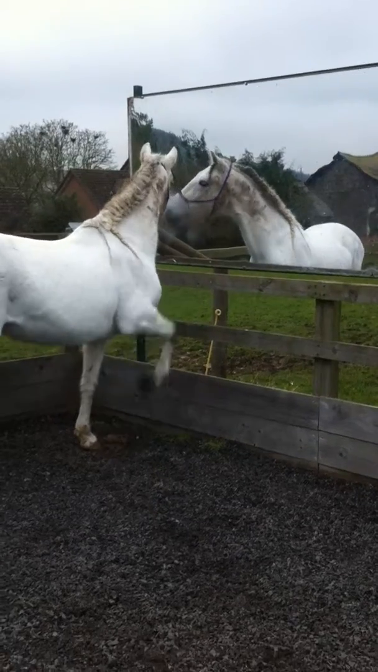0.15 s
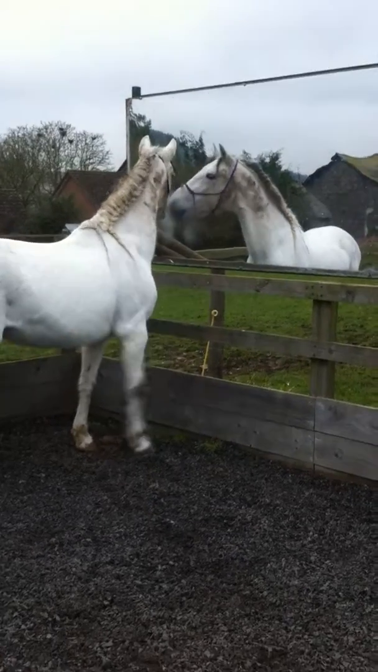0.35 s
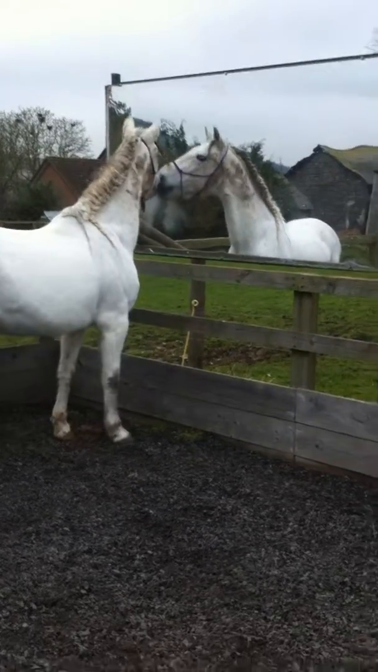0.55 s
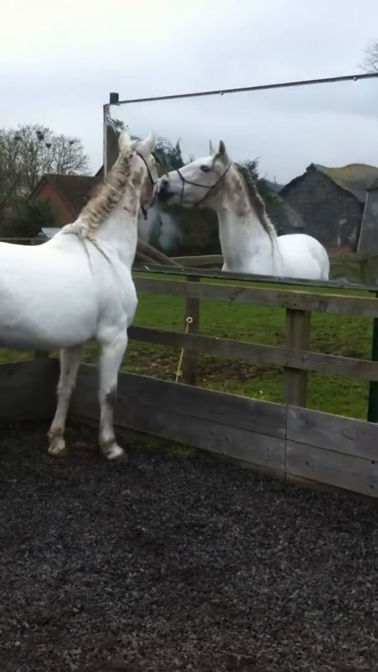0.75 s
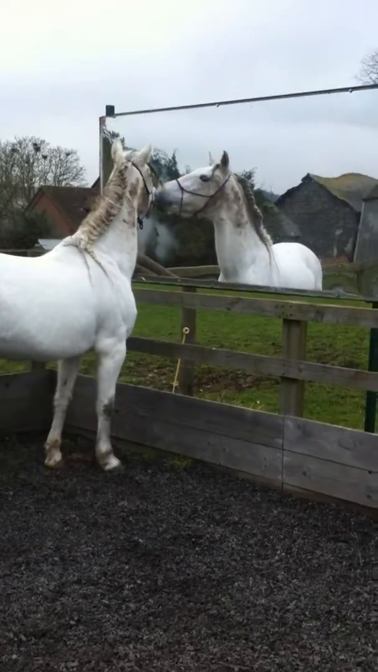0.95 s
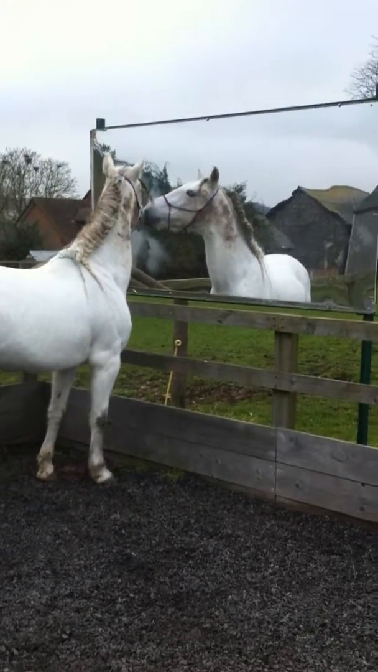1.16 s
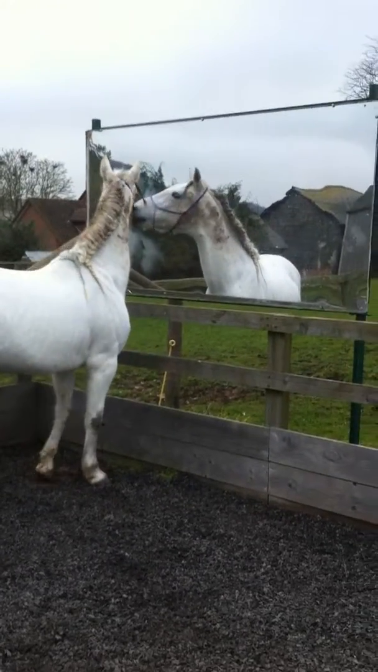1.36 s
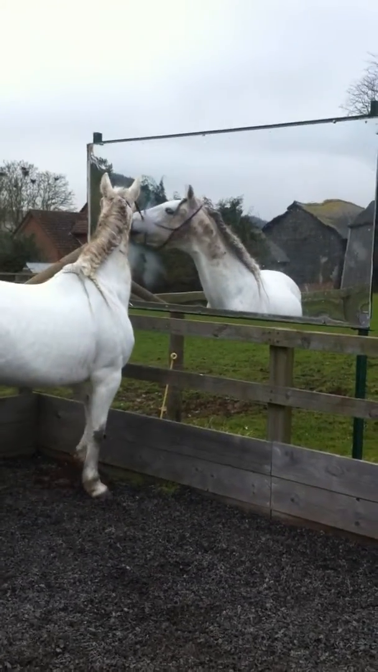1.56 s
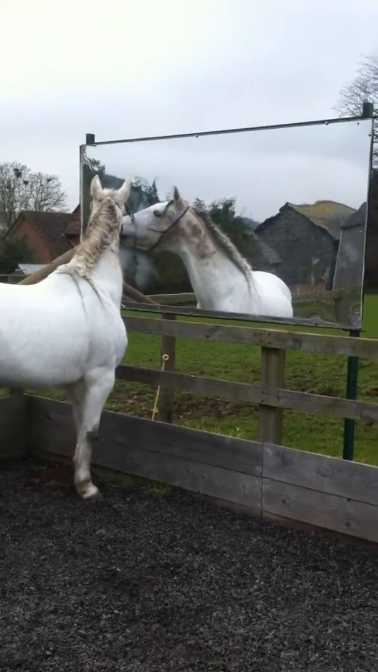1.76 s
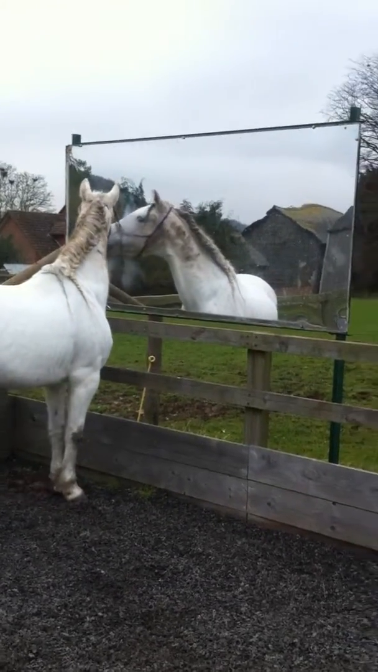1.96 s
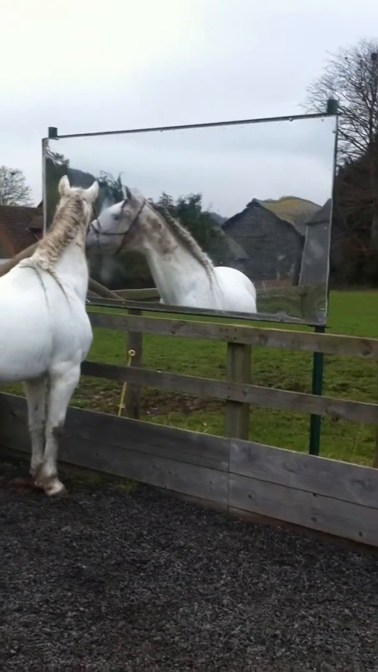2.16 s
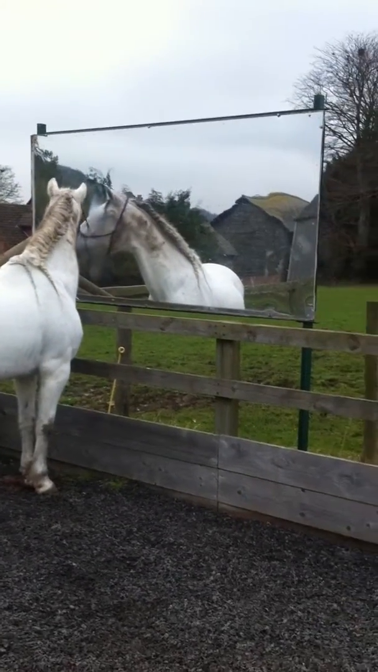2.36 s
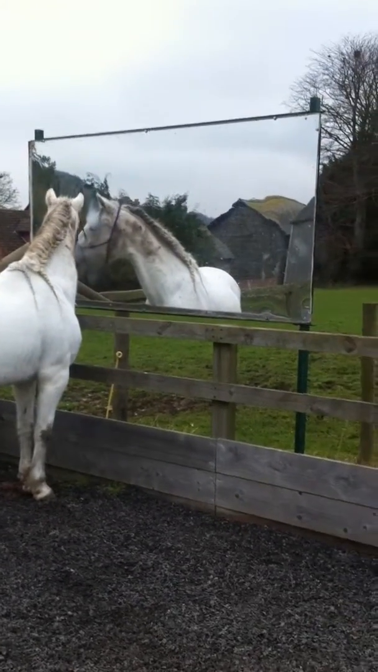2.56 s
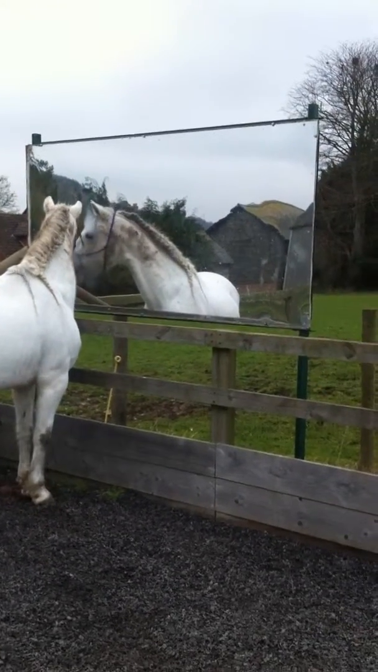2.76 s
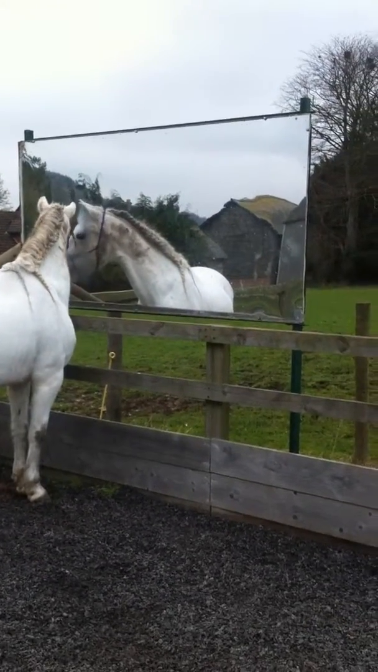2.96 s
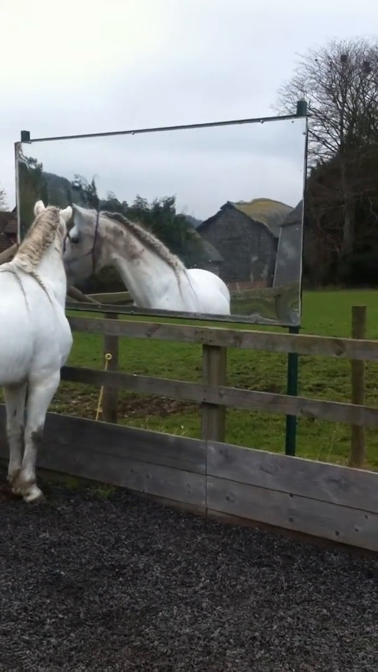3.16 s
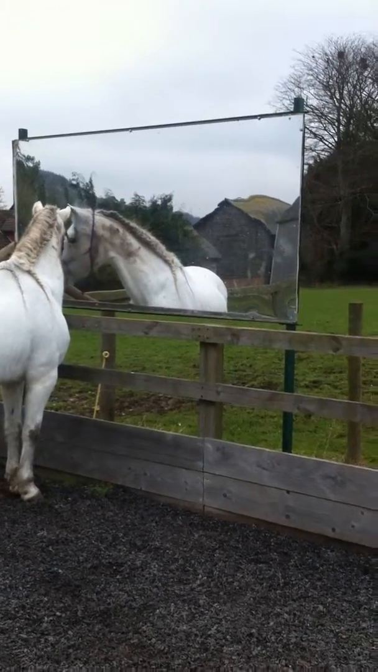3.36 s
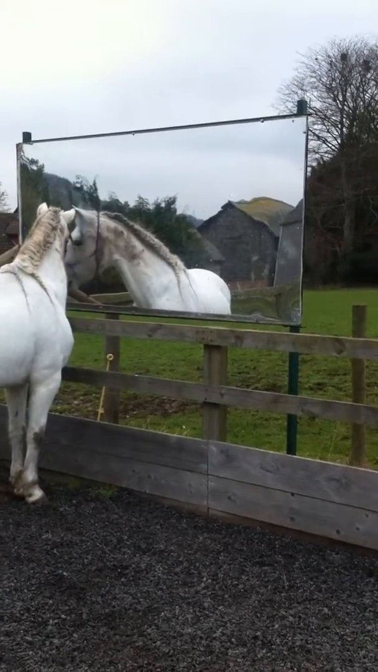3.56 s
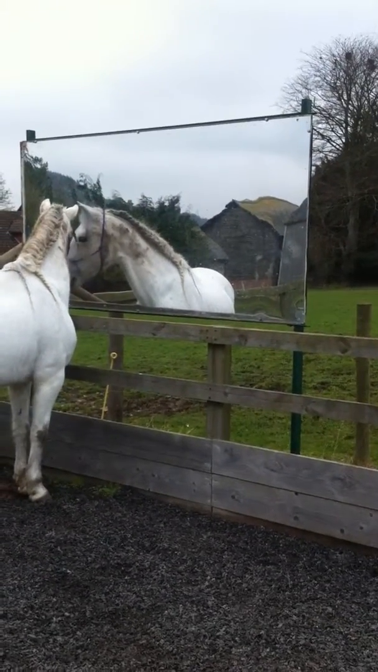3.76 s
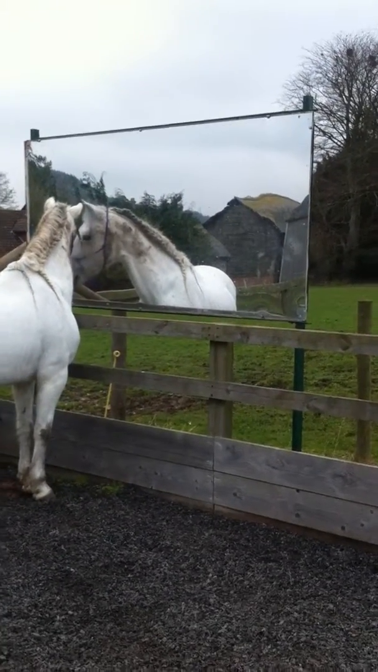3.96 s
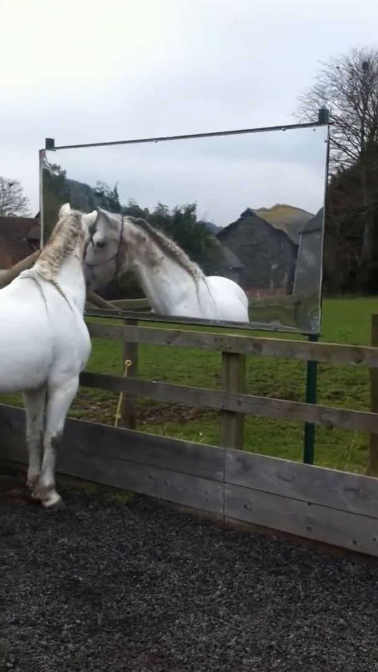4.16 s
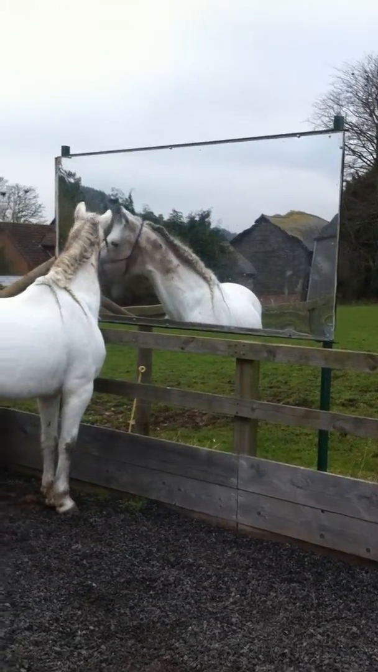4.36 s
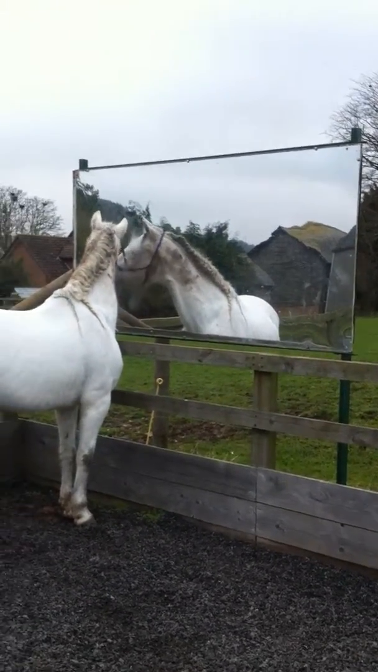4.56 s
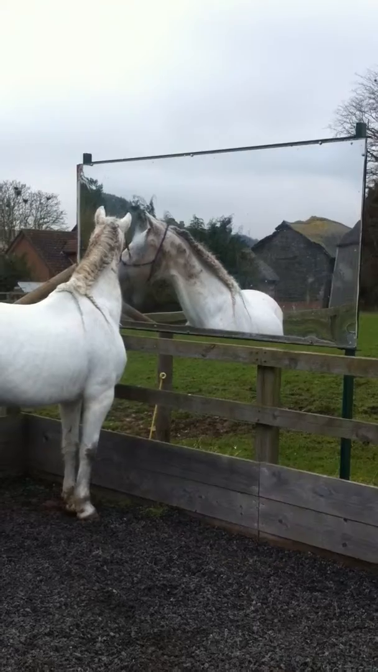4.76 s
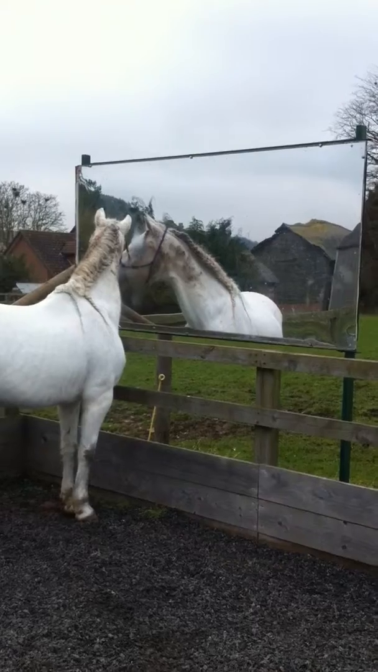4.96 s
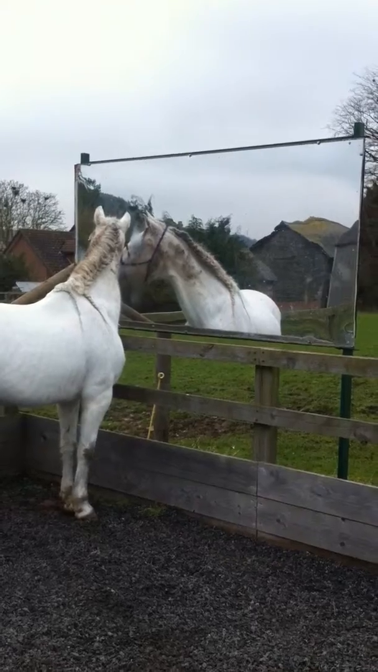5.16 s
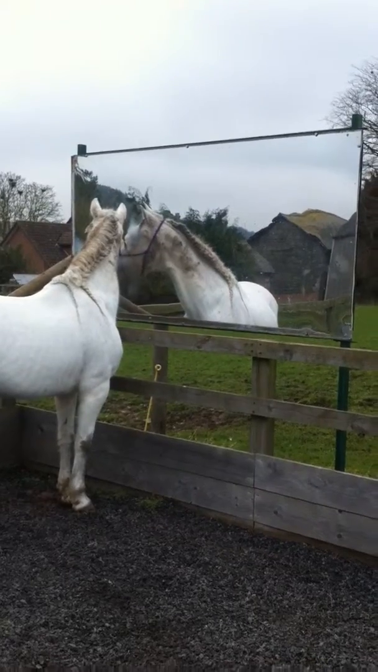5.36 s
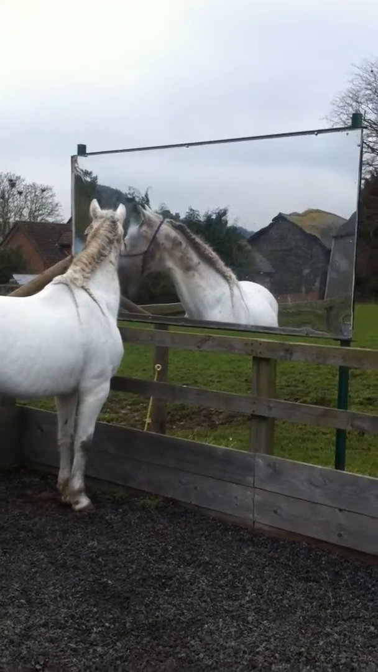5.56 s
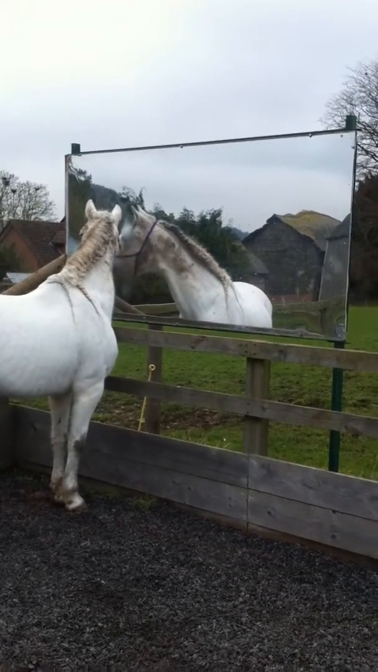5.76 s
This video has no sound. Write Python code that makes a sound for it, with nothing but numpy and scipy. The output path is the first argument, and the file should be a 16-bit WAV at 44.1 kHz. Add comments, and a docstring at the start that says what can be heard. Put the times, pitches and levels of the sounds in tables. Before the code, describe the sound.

A horse gives one high, strained squeal and stamps a hoof, then faint birds call over a hush of distant traffic.

```python
"""Distant traffic hushes over open country, and a small bird wheezes faintly. In a sand school a horse
squeals at its image in a mirror: the vocal folds shoot up to a strained tone, a second whistle beating
against it. A forefoot stamps as the closing mouth turns the call hoarse and nasal; it drops to a grunt,
and far buildings echo it. Grit ticks under the hooves, the songbird whistles, another bird chips in short
series, a hollow rush passes far off, and the songbird returns."""
import sys
import numpy as np
from scipy import signal
from scipy.fft import rfft, irfft, next_fast_len
from scipy.io import wavfile
from scipy.ndimage import map_coordinates

SR = 44100
rng = np.random.default_rng(int(sys.argv[2]) if len(sys.argv) > 2 else 0)


def pcm_store(signal):
    """Save signal as 16-bit PCM."""
    levels = np.round(np.clip(np.atleast_2d(signal), -1, 1) * 32767)
    wavfile.write(sys.argv[1], SR, levels.astype(np.int16).T)


N = 256220

# Table levels are set ahead of each layer's own trim.
# swell of the distant traffic: time_s, level_db
TRAFFIC_SWELL = [(1.5, -62.5), (2, -65.5), (2.8, -67), (3.6, -63), (4.6, -62), (5.1, -63), (5.6, -61.5)]
# colour of the traffic, and of the steady bed under it: freq_hz, level_db
TRAFFIC_COLOUR = [(100, -42), (130, -9.5), (200, 2), (290, -11.5), (450, -3), (620, 1.5), (850, -4),
                  (1200, -12.5), (2000, -23), (4000, -72)]
BED_COLOUR = [(25, -1), (45, 2.5), (80, 5), (130, 16.5), (200, 13), (300, 10), (1000, 6.5), (2500, -1.5),
              (5000, -3), (8000, -4), (12000, -7), (15700, -4.5)]
# songbird's notes: start_s, length_s, start_hz, end_hz, level_db, blur_hz
SONG_NOTES = [(-.08, .23, 3160, 3100, -71.5, 187), (1.464, 0.092, 4450, 4450, -68.5, 44.6),
              (1.553, 0.08, 4400, 4530, -72, 80), (1.686, 0.071, 5850, 5000, -69.5, 110),
              (1.822, 0.43, 4270, 3560, -72.5, 411), (2.038, 0.4, 3750, 2915, -71, 290),
              (2.303, .1, 2750, 1770, -71, 186), (5.437, .071, 6000, 5540, -74.5, 123),
              (5.53, 0.43, 3990, 3690, -71.5, 384)]
# the squeal's rise and fall: time_s, pitch_hz
SQUEAL_PITCH = [(.11, 550), (.135, 631.6), (.165, 858.5), (.2, 1068), (.24, 1182), (.3, 1196), (.4, 1207),
                (.49, 1197), (.58, 1167), (.71, 1129), (.768, 1132), (.825, 923.6), (.865, 903.5),
                (.89, 783), (.915, 495), (.975, 252)]
# push behind it: time_s, level_db
SQUEAL_EFFORT = [(0.11, -66), (0.124, -47.5), (0.164, -38), (0.296, -34), (0.336, -36), (0.436, -33.5),
                 (0.552, -40), (0.628, -40), (0.672, -35), (0.68, -43.5), (0.708, -34.5), (0.724, -38),
                 (0.812, -35.5), (0.9, -42), (0.954, -60), (0.98, -47)]
# the mouth, shut (0) to wide (1): time_s, opening
MOUTH_OPENING = [(.47, 0.76), (.515, 0.9), (.545, 0.48), (.66, 0), (.76, 0.03), (.84, 0.25), (.95, 0.8)]
# the voice, clear (0) to hoarse (1): time_s, amount
HOARSENESS = [(.15, 0.06), (.29, 0.43), (.43, 0.22), (.485, .6), (.57, 0.88), (.66, 0.52), (.7, 0.71),
              (.75, 0.41), (.8, 0.56), (.85, 0.29), (.95, 0.4)]
# voice colour through the open mouth, and with it shut: freq_hz, gain_db
OPEN_COLOUR = [(600, -14), (930, 5), (1070, -3), (1200, -3.5), (1800, -1.5), (2130, 1.5), (2400, -23),
               (3150, -30), (3620, 1), (4300, -8.5), (4820, -4.5), (5600, -19), (6000, -18), (7200, -25),
               (8450, -19), (9650, -17.5), (11000, -24), (12100, -23), (15500, -33)]
SHUT_COLOUR = [(450, 10), (830, -16), (950, -27.5), (1150, -25), (1430, -6), (1830, -3), (2290, 4),
               (2700, -16.5), (3400, 5), (3650, -7), (4100, -31), (6000, -25), (9500, -38), (15500, -46)]
# resonances of the nose: centre_hz, width_hz, gain_db
NOSE_MODES = [(1473, 280, -4), (2054, 193, 4.5), (3150, 140, -7.5), (3370, 980, -16.5), (4280, 740, -13),
              (5350, 310, -21)]
# notches cut by the nasal side passages: centre_hz, width_hz
NOSE_NOTCHES = [(2660, 120), (4150, 21), (6400, 290)]
# breath hiss: freq_hz, level_db
BREATH_COLOUR = [(3500, -26), (4500, -5), (5600, 4), (7000, 1), (8700, 4.5), (10500, 5), (12500, -11),
                 (15500, -18)]
# resonances of the chest: centre_hz, width_hz, gain_db
CHEST_MODES = [(519, 250, 8), (850, 105, 8)]
# croaks from the chest: start_s, length_s, level_db
CHEST_CROAKS = [(0.295, 0.084, -47), (0.383, 0.15, -57), (0.786, 0.1, -52), (0.876, 0.071, -50.5)]
# held notes of the whistle, relative to the voice: start_s, length_s, pitch_hz, level_db
WHISTLE_NOTES = [(.215, 0.0552, 1880, -12), (.27, 0.099, 1995, -5.5), (.37, 0.0651, 1903, -7.5),
                 (0.436, .125, 2016, -9.5), (.59, 0.0942, 1835, -6), (.695, 0.024, 1835, -0.5),
                 (.725, .075, 1822, -14)]
# sum tones, the whistle plus a harmonic of the voice: harmonic_number, level_db
SUM_TONES = [(1, -8), (2, -24), (3, -11), (4, -18.5), (5, -27)]
# the voice breaks upward: start_s, length_s, start_hz, end_hz
VOICE_CRACK = (.485, .052, 990, 1400)
# toe, full weight and settling of the hoof: start_s, level_db
HOOF_HITS = [(.522, -42.5), (.535, -43), (.572, -61)]
# resonances of the ground: centre_hz, width_hz, gain_db
GROUND_MODES = [(139, 130, 0), (200, 55, 3.5), (255, 240, -0.5)]
# shifting grit: start_s, level_db
GRIT_TICKS = [(1.5894, -50.5), (1.6232, -50.5), (1.9794, -51.5)]
# falling bird chips: start_s, length_s, start_hz, level_db
CHIP_NOTES = [(2.848, 0.036, 3800, -66.5), (2.94, 0.045, 3840, -65.5), (3.053, 0.039, 3620, -64.5),
              (3.161, 0.038, 3720, -65), (3.266, 0.036, 3780, -65), (3.674, .025, 4080, -68),
              (3.756, 0.029, 4080, -67.5), (3.861, 0.037, 4140, -67), (4.515, .034, 4230, -68.5),
              (4.592, 0.029, 4200, -68), (4.688, 0.028, 4070, -70.5), (4.796, .024, 4150, -70)]
# far, hollow rush: start_s, length_s, level_db
RUSH_SWELL = (3.58, 0.23, -65)
# decay of the yard's tail: freq_hz, t60_s
YARD_DECAY = [(200, 0.9), (2000, 0.36), (10000, 0.038)]
# slaps off far walls: delay_s, level_db
WALL_ECHOES = [(.125, -29), (.215, -31), (.27, -35.5), (.315, -26)]


def amp(db):
    """Decibels to gain."""
    return 10 ** (np.asarray(db) / 20)


def unit(x):
    """Scaled to rms 1."""
    return x / np.sqrt(np.mean(x ** 2) + 1e-20)


def clock():
    """The time of each sample."""
    return np.arange(N) / SR


def curve(points):
    """An automation curve through (time_s, value) points."""
    return np.interp(clock(), *np.transpose(points))


def along(points, hz):
    """(freq_hz, value) points read on a log axis."""
    freqs, values = np.transpose(points)
    return np.interp(np.log(np.abs(hz) + 1), np.log(freqs + 1), values)


def gate(start, length, edge_s=0.01):
    """1 within a time span, with soft edges."""
    return np.clip(.5 + np.minimum(clock() - start, start + length - clock()) / edge_s, 0, 1)


def arch(start, length, db):
    """An envelope that swells and fades."""
    return amp(db) * np.sin(np.pi * np.clip((clock() - start) / length, 0, 1))


def strikes(hits, attack_s, t60_s):
    """Summed envelopes that rise quickly and die away."""
    ages = [(np.maximum(clock() - start, 0), db) for start, db in hits]
    return sum(amp(db - 60 * age / t60_s) * (1 - np.exp(-age / attack_s)) for age, db in ages)


def wobble(rate, size=N):
    """A smooth random curve, rate knots a second."""
    knots = rng.standard_normal(int(size * rate / SR) + 4)
    steps = np.arange(len(knots) * 6) / 6
    return np.interp(np.arange(size) * rate / SR, steps, map_coordinates(knots, [steps]))


def phase_of(hz):
    """Phase of an oscillator that follows a pitch curve."""
    return 2 * np.pi * np.cumsum(hz) / SR


def filtered(x, response):
    """x through an EQ given as gain against frequency."""
    size = next_fast_len(N + SR // 2)
    return irfft(rfft(x, size) * response(np.fft.rfftfreq(size, 1 / SR)), size)[:N]


def noise(colour):
    """Coloured noise at rms 1."""
    return unit(filtered(rng.standard_normal(N), lambda f: amp(along(colour, f))))


def resonate(x, modes):
    """x through steep-sided resonances, at rms 1."""
    def peaks(f):
        return sum(amp(db) * (f * width) ** 2 / ((hz ** 2 - f ** 2) ** 2 + (f * width) ** 2)
                   for hz, width, db in modes)
    return unit(filtered(x, peaks))


def glide(start, length, start_hz, end_hz, db, quaver_hz):
    """One whistled slide that swells and fades; a fast quaver makes it wheezy."""
    span = np.arange(max(round(start * SR), 0), min(round((start + length) * SR), N))
    progress = (span / SR - start) / length
    pitch = start_hz + (end_hz - start_hz) * progress + quaver_hz[span]
    out = np.zeros(N)
    out[span] = amp(db) * np.sqrt(2) * np.sin(np.pi * progress) * np.sin(phase_of(pitch))
    return out


def country_hush(traffic_trim_db=-2.5, bed_db=-66):
    """Distant traffic swells gently over a steady bed of rumble and hiss."""
    swell = amp(curve(TRAFFIC_SWELL) + traffic_trim_db + 0.23 * wobble(4.03))
    return swell * noise(TRAFFIC_COLOUR) + amp(bed_db) * noise(BED_COLOUR)


def songbird(trim_db=-1):
    """A small bird whistles and wheezes."""
    quaver = wobble(900)
    return amp(trim_db) * sum(glide(*note, blur_hz * quaver) for *note, blur_hz in SONG_NOTES)


def squeal(jitter=0.0035, waver=0.0032, cycles_per_flutter=5.7, tone_db=-1.5, rasp_db=-1):
    """Tone, rasp and whistle ride one flow of air; the chest croaks and the voice cracks once."""
    pitch, mouth, hoarse = curve(SQUEAL_PITCH), curve(MOUTH_OPENING), curve(HOARSENESS)
    start, end = SQUEAL_PITCH[0][0], SQUEAL_PITCH[-1][0]
    effort = amp(curve(SQUEAL_EFFORT)) * gate(start, end - start)
    phase = phase_of(pitch * (1 + jitter * wobble(600) + waver * wobble(110.7)))
    flutter = phase_of(pitch / cycles_per_flutter * (1 + .05 * wobble(120)))
    tone = amp(tone_db) * np.sqrt(1 - hoarse ** 2) * vocal_folds(phase, flutter, mouth, hoarse)
    whistling, strength = whistle(phase, mouth)
    rasp = amp(rasp_db) * nasal_rasp(phase, flutter, mouth, hoarse)
    voice = (tone + whistling + rasp) / np.hypot(1, strength)  # duck to make room for the whistle
    return effort * voice + chest(effort) + glide(*VOICE_CRACK, db=-44, quaver_hz=40 * wobble(400))


def slack_tilt(tight_hz=1210, slack_db=-7, onset_db=-14.5, build_s=0.077):
    """Treble tilt in dB per octave: the folds sound dull at low pitch and until pressure builds."""
    octaves_down = np.maximum(np.log2(tight_hz / curve(SQUEAL_PITCH)), 0)
    age = np.maximum(clock() - SQUEAL_PITCH[0][0], 0)
    return slack_db * octaves_down + onset_db * np.exp(-age / build_s)


def vocal_folds(phase, flutter, mouth, hoarse, flutter_depth=0.27, tear=.5, ragged_db=3):
    """Harmonics shaped by mouth or nose; hoarseness makes them flutter and tear, the highest first."""
    size = SR  # the call is over within the first second
    pitch, tilt = curve(SQUEAL_PITCH)[:size], slack_tilt()[:size]
    phase, flutter, mouth, hoarse = (x[:size] for x in (phase, flutter, mouth, hoarse))
    chaos = 0.1 + .6 * hoarse ** 2
    tone, power = 0, 0
    for k in range(1, 14):
        colour_db = mouth * along(OPEN_COLOUR, k * pitch) + (1 - mouth) * along(SHUT_COLOUR, k * pitch)
        gain = amp(colour_db + tilt * np.log2(k))
        sway = 1 + chaos * wobble(260, size)
        sway += flutter_depth * hoarse * np.cos(flutter + rng.uniform(0, 2 * np.pi))
        ragged = amp(ragged_db * np.log10(k) * (wobble(250, size) + wobble(24.6, size)))
        tone += gain * sway * ragged * np.sin(k * (phase + tear * chaos * wobble(400, size)))
        power += gain ** 2
    return np.pad(tone * np.sqrt(2 / power), (0, N - size))


def flutter_buzz(phase, flutter):
    """A buzz of sidebands around the second harmonic, spaced by the flutter rate."""
    bands = sum(np.sin(2 * phase[:SR] + k * flutter[:SR] + rng.uniform(0, 2 * np.pi))
                for k in range(-10, 19))
    return np.pad(unit(bands), (0, N - SR))


def nasal_rasp(phase, flutter, mouth, hoarse, hiss_db=-14.5, shut_db=-18, unrest_db=2):
    """Buzz and turbulence sound through the nose; air hisses from the open mouth."""
    buzz = flutter_buzz(phase, flutter)
    turbulence = 0.87 * noise([(200, -.5), (5000, 2), (9000, -37)])
    nose = resonate(buzz + turbulence, NOSE_MODES)
    nose = hoarse * nose / np.std(nose[:SR])
    hiss = amp(hiss_db + shut_db * (1 - mouth) + 0.78 * slack_tilt()) * noise(BREATH_COLOUR)
    unrest = amp(unrest_db * hoarse * wobble(130.2))
    return filtered(unrest * (nose + hiss), side_passages)


def side_passages(f):
    """Notch EQ: the nose's side passages swallow narrow bands."""
    return np.prod([1 - np.exp(-((f - hz) / width) ** 4) for hz, width in NOSE_NOTCHES], axis=0)


def chest(effort, under_db=-24):
    """A low, rough resonance lies under the whole call and bursts out in croaks."""
    level = amp(under_db) * effort + sum(arch(*croak) for croak in CHEST_CROAKS)
    return level * resonate(rng.standard_normal(N), CHEST_MODES)


def whistle(phase, mouth, blur=0.012, open_under_db=-7, shut_under_db=-13, shut_db=-14):
    """A second oscillator, chopped by the folds into sum and difference tones; gives sound, strength."""
    starts, lengths, note_hz, note_db = np.transpose(WHISTLE_NOTES)
    gates = np.array([gate(*span) for span in zip(starts, lengths)])
    pitch = note_hz @ gates / (gates.sum(0) + 1e-9)
    strength = amp(note_db) @ gates
    own_phase = phase_of(pitch * (1 + blur * wobble(400)))
    tone = amp(2.7 * wobble(220)) * np.sin(own_phase)
    sums = sum(amp(db + shut_db * (1 - mouth) + 2.8 * wobble(200)) * np.sin(own_phase + k * phase)
               for k, db in SUM_TONES)
    # it beats with the first harmonic while the mouth is open, with the second once it shuts
    under = mouth * amp(open_under_db) * np.sin(own_phase - phase)
    under += (1 - mouth) * amp(shut_under_db) * np.sin(2 * phase - own_phase)
    return np.sqrt(2) * strength * (tone + sums + under), strength


def hoof_stamp(trim_db=4):
    """The forefoot thuds into soft footing: the ground rings briefly and loose sand scrunches."""
    age = clock() - HOOF_HITS[1][0]
    ring = sum(amp(db) * np.sin(2 * np.pi * hz * age) for hz, _, db in GROUND_MODES)
    scrunch = resonate(rng.standard_normal(N), GROUND_MODES)
    return amp(trim_db) * strikes(HOOF_HITS, attack_s=0.0041, t60_s=0.089) * unit(unit(ring) + scrunch)


def grit(trim_db=-11):
    """Grit shifts under the hooves in small, bright ticks."""
    crunch = noise([(1500, -12), (5500, -2), (11000, -10), (15000, -10)])
    return amp(trim_db) * strikes(GRIT_TICKS, attack_s=.001, t60_s=0.051) * crunch


def chipping_bird(trim_db=-2, fall_hz=1010, bend_hz=60, blur_hz=70):
    """A second bird calls in short series of falling chips, no two bent alike."""
    quaver = blur_hz * wobble(900) + bend_hz * wobble(90)
    chips = sum(glide(start, length, hz, hz - fall_hz, db, quaver) for start, length, hz, db in CHIP_NOTES)
    return amp(trim_db) * chips


def far_rush():
    """A hollow band of noise swells briefly in the distance."""
    return arch(*RUSH_SWELL) * noise([(200, -27), (340, 2), (520, 5), (620, -4), (900, -39)])


def yard(dry, tail_db=-21, smear=0.38):
    """Fence and ground scatter a short tail; far buildings return dull, blurred echoes."""
    hz, age, spectrum = signal.stft(rng.standard_normal(SR // 2), SR, nperseg=256)
    decay = amp(-60 * age / along(YARD_DECAY, hz)[:, None])
    _, tail = signal.istft(spectrum * decay, SR, nperseg=256)
    scatter = signal.fftconvolve(dry, tail / np.linalg.norm(tail))[:N]
    blurred = (dry + smear * scatter) / np.hypot(1, smear)
    dull = [(300, -21), (1000, 5.5), (2000, -0.5), (3500, -5), (6000, -21), (12000, -26)]

    def walls(f):
        slaps = sum(amp(db) * np.exp(-2j * np.pi * f * delay) for delay, db in WALL_ECHOES)
        return amp(along(dull, f)) * slaps
    return dry + amp(tail_db) * scatter + filtered(blurred, walls)


def scene():
    """Horse and birds echo round the yard, over the country hush; mono."""
    sources = squeal() + hoof_stamp() + grit() + chipping_bird() + songbird()
    return (yard(sources) + country_hush() + far_rush())[None]


def record(dry, top_hz=15800):
    """Master EQ: thin the deep bass and cut off the extreme top."""
    bass_cut = [(20, -1), (50, -9), (90, 0)]
    return filtered(dry[0], lambda hz: amp(along(bass_cut, hz)) * (hz < top_hz))[None]


dry = scene()
out = record(dry)
pcm_store(out)
```